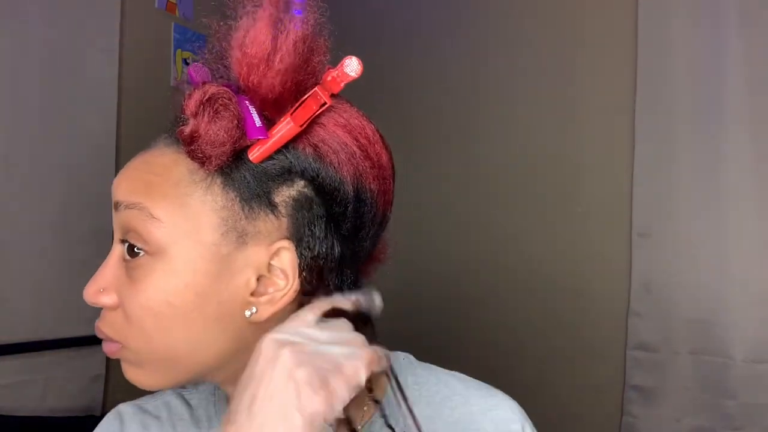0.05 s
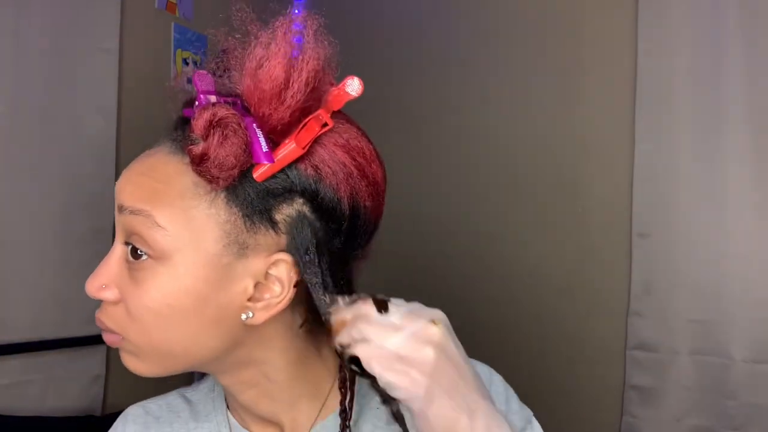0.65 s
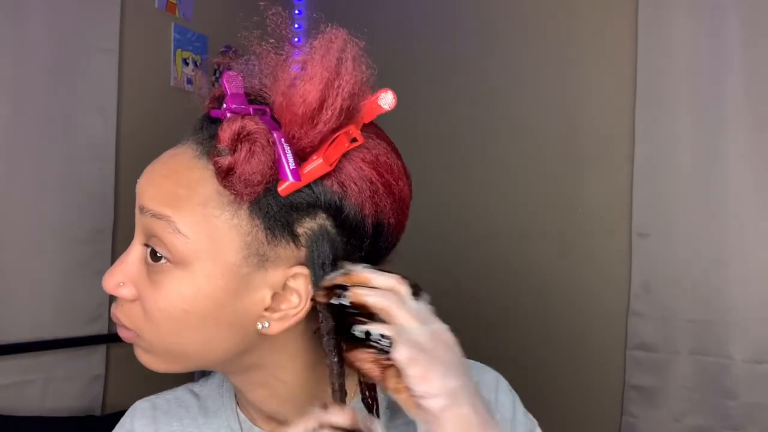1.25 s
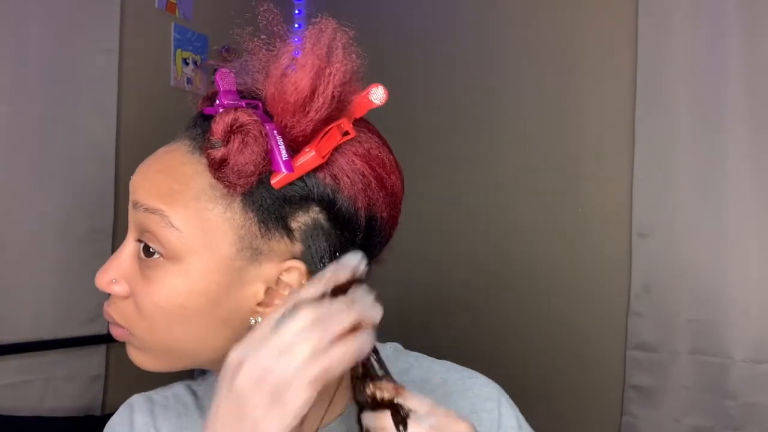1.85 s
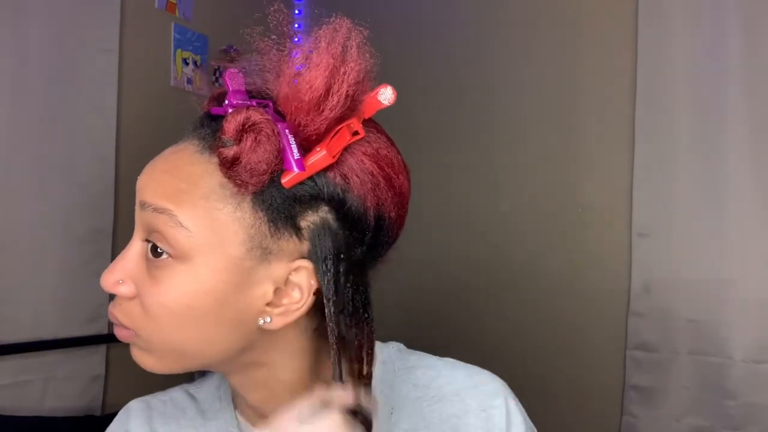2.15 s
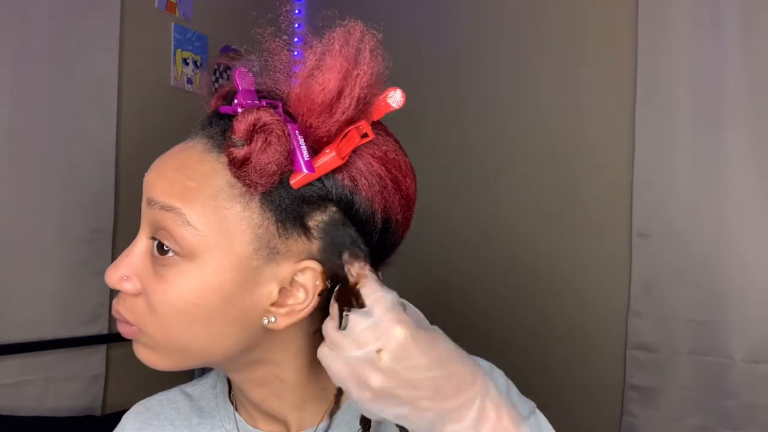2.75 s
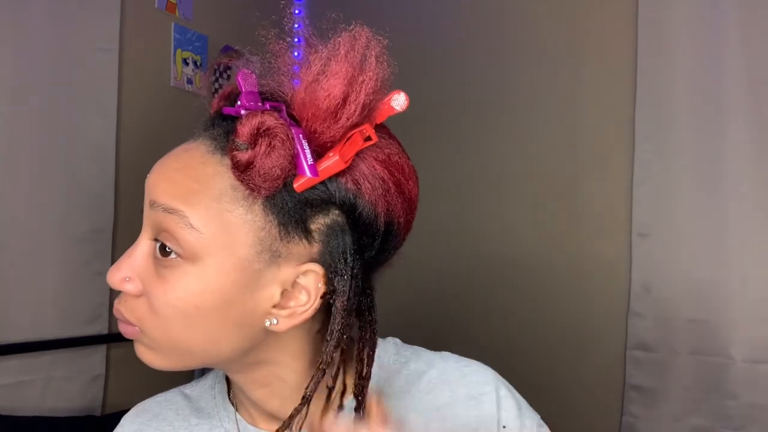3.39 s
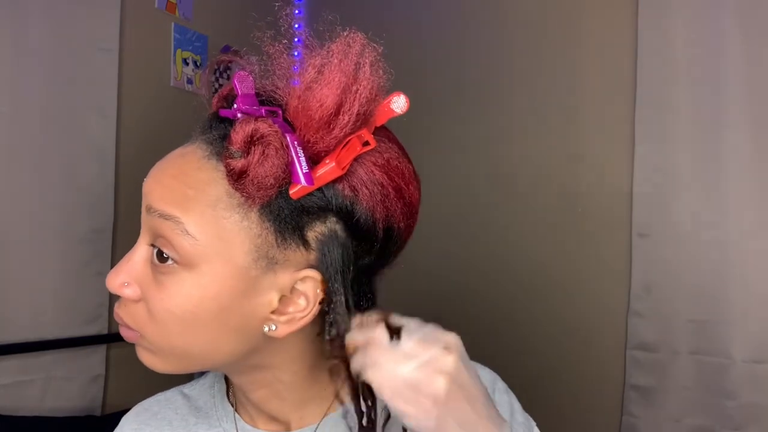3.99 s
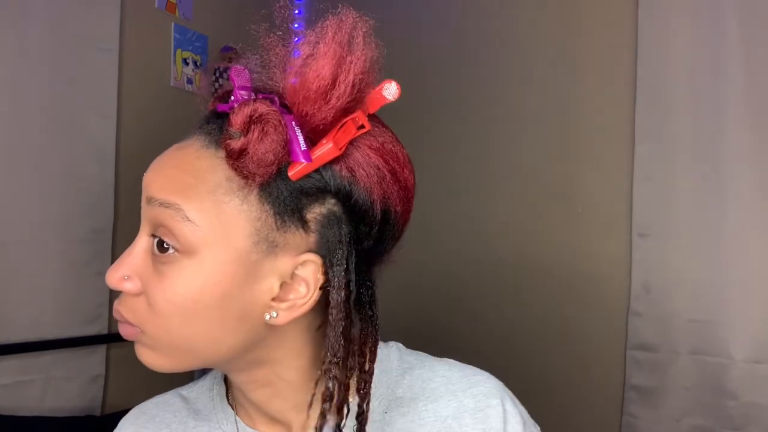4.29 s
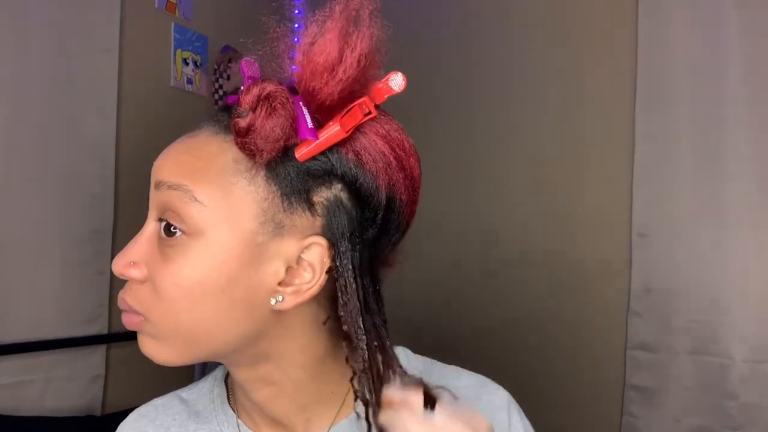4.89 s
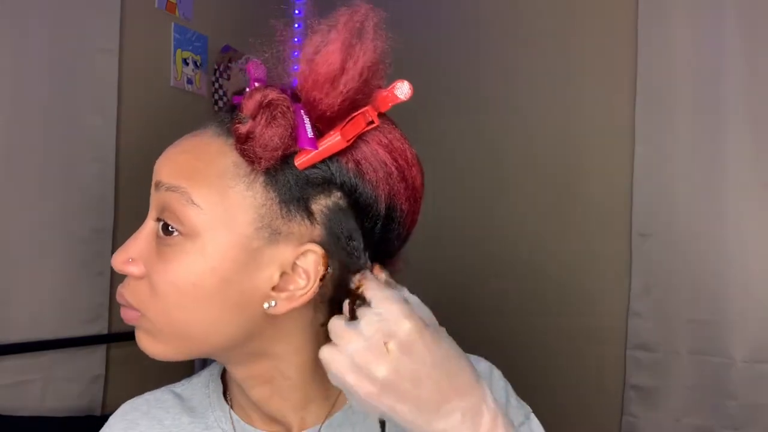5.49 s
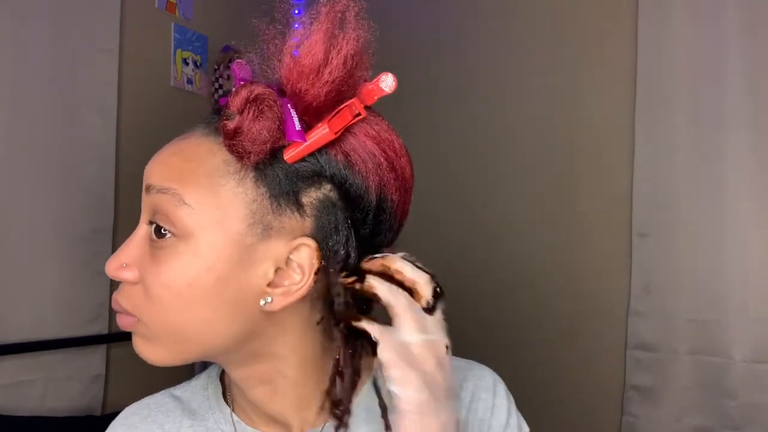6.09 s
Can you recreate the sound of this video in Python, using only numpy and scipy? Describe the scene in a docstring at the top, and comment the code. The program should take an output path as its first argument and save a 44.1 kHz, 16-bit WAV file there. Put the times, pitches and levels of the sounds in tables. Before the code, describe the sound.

Wet hair crackles softly in repeated strokes as a glove slips, squeaks and snaps once, over a throbbing hum and fan air.

```python
"""A small room, close on gloved hands dyeing a lock of hair, heard at a phone's two microphone ports.
From the start, motors just under and over mains speed beat against the mains hum, over fan air.
Up close, stroke after stroke, strands and sticky paste crackle; the glove slips, ticks and squeaks.
At 0.6 s the glove snaps once, with a pop and a hollow ring; just after, a sleeve rubs as the arm lifts.
The strokes go on; near 5.2 s the sound dips briefly, as at an edit, then the sleeve rubs twice more."""
import sys
import numpy as np
from scipy import signal
from scipy.fft import rfft, irfft
from scipy.io import wavfile
from scipy.ndimage import uniform_filter1d

SR = 44100
rng = np.random.default_rng(int(sys.argv[2]) if len(sys.argv) > 2 else 0)


def wrap_up_sound(samples):
    """Save the sound to the file named by the first command line argument, as 16-bit audio."""
    columns = np.atleast_2d(samples).T
    # keep every value between -1 and 1, then stretch to whole-number steps
    tamed = np.clip(columns, -1, 1)
    steps = np.round(tamed * 32767).astype(np.int16)
    wavfile.write(sys.argv[1], SR, steps)


N = 270638
TIME = np.arange(N) / SR
BINS = np.fft.rfftfreq(N, 1 / SR)

# lines of the mains and the motors: f/Hz
HUM_HZ = [58.66, 62.0, 117.32, 120.01, 175.93, 138.96, 82.12, 87.37, 189.6, 234.6, 245.5, 368.6, 371.3]
# strength of each line: level/dB
HUM_DB = [-60.5, -59, -52, -47, -58, -64.5, -67, -72.5, -71.5, -75, -78, -75, -75.5]
# the hum wavers: t/s, gain/dB
HUM_DRIFT = [(0.1, -1), (0.45, 0), (0.8, -1), (1.2, 0.5), (1.55, -3), (2.3, 0), (3.0, -1.5), (6.1, -0.45)]
# likeness of the room air at the two ports: f/Hz, likeness/0-1
AIR_LIKENESS = [(100, 0.92), (200, 0.67), (330, 0.5), (550, 0), (1500, 0), (12000, 0.05)]
# spectrum of the room air: f/Hz, gain/dB
AIR_COLOUR = [(20, -13.5), (35, -15.5), (55, 0), (90, 0.5), (160, -3), (210, -12.5), (265, -18.5),
              (330, -17), (460, -24), (620, -27.5), (900, -33.5), (1400, -40), (4000, -48.5),
              (15000, -79.5)]
# swells of low rumble: t/s, level/dB
RUMBLE = [(0, -58), (0.55, -50), (0.7, -60), (1.05, -53), (1.6, -53.5), (2.4, -51.5), (2.9, -64),
          (3.35, -53.5), (3.8, -60), (4.4, -63), (4.65, -49), (5.1, -71), (5.4, -68), (5.65, -49),
          (6.1, -54)]
# panel resonances rung by the fan air: f/Hz, width/Hz, level/dB
PANEL_TONES = [(182.5, 18, -65), (230.5, 10, -73.5), (243.7, 10, -73), (288.7, 24, -77), (372.1, 16.3, -73),
               (410.3, 30, -80), (526.6, 49, -77.5)]
# strokes along the hair: t/s, length/s, level/dB, paste crackle offset/dB, glove slip offset/dB
STROKES = [(0.016, 0.084, -67, -6, -2.5), (0.22, 0.16, -73, -4.5, -4), (0.394, 0.064, -69, -2.5, -15),
           (0.5, 0.14, -66, -13, -3.5), (0.677, 0.055, -69.5, -5, -9), (0.783, 0.036, -64.5, -2, -3.5),
           (0.891, 0.086, -65.5, -6, 0), (1.151, 0.077, -69.5, -21, 4), (1.33, 0.076, -73, -8, -2),
           (1.45, .28, -68, -22, -2), (1.818, 0.045, -70, -6, -4), (1.892, 0.082, -70.5, -1, -0.5),
           (2.004, 0.085, -69.5, -8, 3.5), (2.131, 0.065, -76.5, -2.5, 5.5), (2.418, 0.19, -85, -1.5, -11),
           (2.492, 0.024, -82.5, -5, 1.5), (2.754, 0.01, -73.5, -5, -10), (2.817, 0.27, -70.5, -1, 2),
           (3.153, 0.026, -76.5, -10, 1), (3.434, 0.031, -81, -2.5, 3.5), (3.692, 0.17, -74, -5.5, -1),
           (3.9, 0.054, -68.5, -11, -1), (3.944, 0.12, -68.5, -3, 2.5), (4.184, 0.011, -80, -17, 3),
           (4.304, 0.049, -76.5, -8, 3), (4.58, 0.05, -69.5, 2.5, -1), (4.657, 0.093, -69.5, 1, 0.5),
           (4.746, 0.096, -66.5, -1, 2.5), (4.872, 0.03, -71, -4, -4), (4.967, 0.012, -74.5, -18, 2.5),
           (5.073, 0.042, -80, -17, 1), (5.373, 0.17, -69.5, -15, 0), (5.513, 0.14, -69.5, -7, 2.5),
           (5.763, 0.098, -73, -24, 1), (6.073, .07, -71.5, -3, -5.5)]
# spectrum of slipping strands: f/Hz, gain/dB
STRAND_COLOUR = [(400, -23), (1000, 1), (1350, -4), (1800, -1.5), (3000, 0), (4300, 0.5), (5400, 3.5),
                 (6700, -4.5), (8400, -1.5), (11000, -9.5), (15500, -8)]
# ring of the slipping glove film, its pitch wandering over time: t/s, f/Hz
FILM_PITCH = [(0.1, 3203), (0.54, 3694), (0.93, 2978), (1.2, 3050), (2.1, 3100), (2.85, 2957), (3.1, 3108),
              (3.75, 2784), (4.0, 3349), (4.35, 3155), (4.65, 3418), (4.78, 2500), (4.86, 2850),
              (5.0, 3090), (5.45, 2804), (5.64, 3440), (5.85, 3186)]
# soft squeaks of the wet glove, and two low creaks of the sleeve near 0.76 s: centre t/s, half length/s, centre
# f/Hz, level/dB
SQUEAKS = [(0.678, 0.004, 3310, -57), (0.758, 0.007, 880, -64.5), (0.785, 0.003, 850, -56),
           (0.957, 0.022, 2980, -61.5), (1.195, 0.02, 3100, -68), (4.78, 0.014, 1982, -59),
           (4.827, 0.007, 1950, -67), (5.647, .03, 3450, -66.5), (5.755, .004, 3130, -69),
           (5.776, 0.003, 3100, -61)]
# sleeve rubs as the arm lifts: t/s, length/s, relative level/dB
SLEEVE_RUBS = [(0.725, 0.044, -62), (3.845, 0.14, -74), (5.215, 0.2, -70.5), (5.534, 0.31, -74)]
# spectrum of the cloth: f/Hz, gain/dB
SLEEVE_COLOUR = [(120, -6), (290, 10), (420, 7), (600, 2), (800, 1), (1300, -27.5), (3000, -40)]
# glove ticks and pops of paste: t/s, relative level/dB, treble offset/dB, ring f/Hz
TICKS = [(0.181, -54.5, -9, 3100), (0.3142, -45.5, -29, 1670), (0.3538, -60, -16, 4500),
         (0.3712, -48, -16, 1940), (0.389, -60, -18, 3400), (0.423, -55, -6, 5400),
         (0.513, -46.5, -24, 3600), (0.596, -51, 3.5, 3400), (0.793, -46.5, -7, 2920),
         (0.858, -53, -18, 3100), (1.002, -38.5, -20, 3020), (1.462, -50, -17, 2500),
         (1.607, -66, -15, 3100), (1.917, -58, -4, 3100), (2.050, -49.5, -17, 3000),
         (2.315, -59, -29, 2800), (2.475, -67, -12, 4530), (2.756, -60, -14, 4500), (2.823, -66, -12, 3000),
         (2.833, -68, -9, 3000), (4.071, -54, -20, 2900), (4.204, -52.5, -18.5, 2800),
         (4.304, -60.5, -5, 5000), (4.321, -57, -13, 1380), (4.340, -71, -15, 3230), (4.636, -62, -6, 3970),
         (5.075, -60.5, 2.5, 5500), (5.377, -57.5, -2, 3000), (5.488, -51.5, -15, 2900),
         (5.51, -54, -18, 3800), (5.676, -65, -18, 2500), (5.7804, -51.5, -25, 1670),
         (5.7819, -45, -22, 3020), (5.7955, -49.5, -36, 3000)]
# spectrum of a tick's dull part: f/Hz, gain/dB
TICK_COLOUR = [(300, -33), (900, -2.5), (1700, 6.5), (2300, 1.5), (3100, 5), (4200, 6.5), (5200, -1),
               (9000, -20), (15500, -32)]
# the glove snaps and flaps back: t/s, level/dB, fall time/s
SNAP_FLAPS = [(0.597, -37, 0.0047), (0.603, -49.5, 0.016), (0.61, -51, 0.02), (0.62, -55, 0.0099),
              (0.639, -58.5, 0.016)]
# spectrum of the snap: f/Hz, gain/dB
SNAP_COLOUR = [(150, 3), (430, -4.5), (600, 3.5), (800, 1), (1080, 0.5), (1350, -12.5), (1700, -4),
               (2050, -17), (2400, -11), (3500, -10), (5500, -13.5), (8500, -10.5), (12000, -13.5),
               (15500, -17.5)]
# hollow ring after the snap: f/Hz, level/dB, t60/s
SNAP_MODES = [(469, -52.5, 0.23), (519, -60, 0.2), (630, -56, 0.2), (711, -53.5, 0.21), (2410, -59, 0.13)]
CHANNEL_LIKENESS = [(300, 0.65), (1200, 0.12), (2500, 0.39), (4200, 0.62), (6500, 0.092), (8400, 1),
                    (10000, 1), (11300, 0.11), (13000, 1)]
# phase between the channels; hands lead on the right, the coder hollows 8.4-10 kHz
# and centres the top: f/Hz, phase/rad
CHANNEL_PHASE = [(250, .2), (650, 2.2), (1200, 0), (2900, 1.9), (3400, 1.4), (5400, 3.1), (6500, 3.9),
                 (8400, 3.15), (10100, 3.1), (12600, 0)]

HUM_SWELL_S = 0.451  # the hum lines swell together here


def undb(db):
    """Decibels to gain."""
    return 10 ** (np.asarray(db) / 20)


def unit(x):
    """Scale to rms 1."""
    return x / np.sqrt(np.mean(x ** 2))


def over_hz(points):
    """Join (f/Hz, value) points on a log-frequency axis."""
    hz, value = np.transpose(points)
    return np.interp(np.log(BINS + 1), np.log(hz), value)


def over_time(points):
    """Join (t/s, value) points with straight lines."""
    return np.interp(TIME, *np.transpose(points))


def colour(x, points):
    """Filter by a (f/Hz, gain/dB) spectrum."""
    return irfft(rfft(x) * undb(over_hz(points)), N)


def resonance(x, hz, width_hz):
    """A damped resonance, gain 1 at its centre."""
    return signal.lfilter(*signal.iirpeak(hz, hz / width_hz, fs=SR), x)


def walk(rate):
    """Random levels held 1 / rate s and slewed twice; spread near 1."""
    hold = int(SR / rate)
    steps = np.repeat(rng.standard_normal(N // hold + 1), hold)
    return 1.85 * uniform_filter1d(uniform_filter1d(steps, hold), hold)[:N]


def crackle(per_s, spread_db):
    """Tiny releases at random moments, a few much larger than the rest."""
    size = undb(spread_db * np.minimum(rng.exponential(size=N), 5))
    return unit((rng.random(N) < per_s / SR) * size * rng.choice([-1, 1], N))


def pan(x, right_db):
    """Place a sound right_db louder on the right than on the left."""
    return x * undb(np.array([[-right_db], [right_db]]) / 2)


def hum():
    """Behind the hands, close pairs of motor and mains lines throb about three times a second."""
    phases = [2 * np.pi * hz * (TIME - HUM_SWELL_S) + .09 * walk(3) for hz in HUM_HZ]
    lines = np.sqrt(2) * sum(undb(db) * np.cos(phase) for db, phase in zip(HUM_DB, phases))
    return lines * undb(over_time(HUM_DRIFT))


def air_at_ports():
    """Noise of moving air at the two ports, alike in the bass."""
    like = np.clip(over_hz(AIR_LIKENESS), 0, 1)
    mid, side = rfft(rng.standard_normal((2, N)))
    mid, side = irfft(mid * np.sqrt(1 + like), N), irfft(side * np.sqrt(1 - like), N)
    return np.array([mid + side, mid - side])


def fan_air(air_db=-53.0, rumble_hz=61, waver_db=1.5, throb_db=1.0, lead_s=0.017):
    """Room tone: moving air, an uneven rumble, and panel tones that swell just ahead of the hum."""
    air = undb(air_db) * unit(colour(air_at_ports(), AIR_COLOUR))
    rumble = unit(resonance(resonance(air_at_ports(), rumble_hz, 22), rumble_hz, 22))
    air += rumble * undb(over_time(RUMBLE))
    beat_hz = HUM_HZ[3] - HUM_HZ[2]
    beat = np.cos(2 * np.pi * beat_hz * (TIME - HUM_SWELL_S + lead_s))
    for hz, width_hz, db in PANEL_TONES:
        tone = resonance(resonance(air_at_ports(), hz, width_hz), hz, width_hz)
        air += undb(db) * unit(tone * undb(waver_db * walk(6) + throb_db * beat))
    return air


def contact(s, length_s, grip_db_per_s=243, release_db_per_s=160):
    """Gain of one rub: it rises as the grip closes, holds, and dies away on release."""
    early, late = np.maximum(s - TIME, 0), np.maximum(TIME - s - length_s, 0)
    return undb(-np.minimum(grip_db_per_s * early + release_db_per_s * late, 100))


def strokes(rest_db=-94, paste_rest_db=-89):
    """Fingers pull and slide off the lock: gains of strands, paste and glove; the strongest pull leads."""
    effort = undb([[rest_db], [paste_rest_db], [rest_db]])
    for s, length_s, db, paste_db, slip_db in STROKES:
        gains = undb([[db], [db + paste_db], [db + slip_db]])
        effort = np.maximum(effort, gains * contact(s, length_s))
    return effort


def threads(low_hz=1750, high_hz=6760, count=8):
    """Threads of paste burst one by one, each ringing for a few cycles at its own pitch."""
    pitches = np.geomspace(low_hz, high_hz, count)
    return unit(sum(unit(resonance(crackle(per_s=26, spread_db=2.1), hz, hz / 4)) for hz in pitches))


def catches(fall_s=0.003, depth=0.17):
    """Sticky fingers move in small jerks: each release is a sudden surge that dies away."""
    releases = np.abs(crackle(per_s=90, spread_db=1.5))
    jerks = signal.lfilter([1], [1, -np.exp(-1 / (fall_s * SR))], releases)
    return unit(1 - depth + depth * 2 * unit(jerks))


def hair(pull, tear, strand_db=3.0, paste_db=5.0, thread_db=-3.5, bubble_db=-4):
    """Close up, strands slip under the glove, paste tears finely, and threads and tiny bubbles burst."""
    releases = crackle(per_s=6000, spread_db=3.5)
    tears = crackle(per_s=5000, spread_db=3.5)
    bubbles = undb(bubble_db) * crackle(per_s=260, spread_db=2.5)
    strands = undb(strand_db) * unit(colour(releases, STRAND_COLOUR))
    paste_colour = [(3000, -52.0), (6000, -2.5), (8500, 1.0), (12000, -3.0), (15500, -4.5)]
    paste = undb(paste_db) * unit(colour(tears + bubbles, paste_colour))
    return (strands + undb(thread_db) * threads()) * pull * catches() + paste * tear


def glove_slips(slip, width_hz=1050, glide=0.051, wander=0.015):
    """Stick and slip rings the glove film in every stroke; a squeak rises as the fingers tighten."""
    lowpass = signal.butter(2, width_hz / 2, fs=SR, output="sos")
    friction = unit(signal.sosfilt(lowpass, crackle(per_s=3500, spread_db=3)))
    film_hz = over_time(FILM_PITCH) * (1 + wander * walk(8))
    film = slip * friction * np.sin(2 * np.pi * np.cumsum(film_hz) / SR)
    for s, half_s, hz, db in SQUEAKS:
        near = np.abs(TIME - s) < 3 * half_s
        offset = (TIME[near] - s) / half_s
        phase = 2 * np.pi * np.cumsum(hz * (1 + glide * np.tanh(offset))) / SR
        film[near] += undb(db) * np.exp(-offset ** 2 / 2) * friction[near] * np.sin(phase)
    return film


def sleeve(pull, follow_db=-6.5, gain_db=1.5):
    """Cloth rubs dully as the arm lifts, and faintly with every stroke."""
    lifts = sum(undb(db) * contact(s, length_s) for s, length_s, db in SLEEVE_RUBS)
    cloth = unit(colour(crackle(per_s=3200, spread_db=4.5), SLEEVE_COLOUR))
    return undb(gain_db) * (lifts + undb(follow_db) * pull) * cloth


def ticks(dull_db=1.0, bright_db=7.5, fizz=0.44, fall_s=0.0012, ring_db=-3.5, cycles=2.5):
    """Sharp releases with a millisecond of fizz and a short ring: dull from glove, bright from paste."""
    dull, bright, ring = np.zeros((3, N))
    t = TIME[:SR // 80]
    for s, db, treble_db, hz in TICKS:
        crack = fizz * rng.choice([-1, 1], len(t)) * np.exp(-t / fall_s)
        crack[0] = 4  # the release itself
        span = slice(int(s * SR), int(s * SR) + len(t))
        dull[span] += undb(db + dull_db) * crack
        bright[span] += undb(db + treble_db + bright_db) * crack
        ring[span] += undb(db + ring_db) * np.sin(2 * np.pi * hz * t) * np.exp(-hz * t / cycles)
    return colour(dull, TICK_COLOUR) + colour(bright, [(3000, -16), (9000, 11), (15500, -4.0)]) + ring


def glove_snap():
    """The glove film cracks against the wrist and flutters briefly."""
    flaps = sum(undb(db) * (TIME >= s) * np.exp(-np.abs(TIME - s) / fall) for s, db, fall in SNAP_FLAPS)
    return unit(colour(rng.standard_normal(N), SNAP_COLOUR)) * flaps


def snap_ring():
    """The snap leaves a short, hollow ring, a little to the right."""
    age = np.maximum(TIME - SNAP_FLAPS[0][0], 0)
    ring = sum(np.sin(2 * np.pi * hz * age) * undb(db - 60 * age / t60) for hz, db, t60 in SNAP_MODES)
    return pan(ring, right_db=2.5)


def air_pocket(start_s=0.5971, ring_hz=1040, rise_s=0.00095, level_db=-38.5):
    """Air trapped under the snapping glove pops for a few cycles."""
    age = np.maximum(TIME - start_s, 0)
    pop = np.sin(2 * np.pi * ring_hz * age) * age / rise_s * np.exp(1 - age / rise_s)
    return pan(undb(level_db) * pop, right_db=5)


def in_room(x, t60, right_db, walls_db=0.0, count=5):
    """The hands lead on the right and wall echoes shift as they move; the coder sets the treble width."""
    t = TIME[:SR // 2]
    walls = 0
    for k in range(count):
        tail = rng.standard_normal((2, len(t))) * undb(-60 * t / t60) * (t > .002)
        tail /= np.sqrt(np.sum(tail ** 2, axis=1, keepdims=True))
        share = np.sqrt(2 / count) * np.cos(2 * np.pi * walk(3) + np.pi * k / count)
        walls = walls + signal.fftconvolve((x * share)[None], tail, axes=1)[:, :N]
    like = np.clip(over_hz(CHANNEL_LIKENESS), .02, .98)
    direct = rfft(x) * np.exp(1j * over_hz(CHANNEL_PHASE) * np.array([[-1], [0]]))
    stereo = irfft(direct * np.sqrt(like) + undb(walls_db) * rfft(walls) * np.sqrt(1 - like), N)
    return pan(stereo, right_db)


def scene():
    """Hands close to the phone and a little to its right, with the room's hum and air behind."""
    pull, tear, slip = strokes()
    lock = in_room(hair(pull, tear), t60=0.12, right_db=0.5)
    rubs = in_room(glove_slips(slip) + sleeve(pull), t60=0.13, right_db=6.0)
    pops = in_room(ticks(), t60=0.12, right_db=1.0, walls_db=-2.5)
    snap = in_room(glove_snap(), t60=0.19, right_db=2.5) + snap_ring() + air_pocket()
    return lock + rubs + pops + snap + hum() + fan_air()


def record(dry, dip_s=5.181, top_hz=15800):
    """The sound dips briefly, as at an edit, and comes back faster; the top is cut."""
    width_s = np.where(TIME < dip_s, 0.028, 0.012)
    dip = 1 - 0.9 * np.exp(-((TIME - dip_s) / width_s) ** 2)
    return signal.sosfilt(signal.ellip(10, .2, 70, top_hz, fs=SR, output="sos"), dry * dip)


dry = scene()
out = record(dry)
wrap_up_sound(out)
```